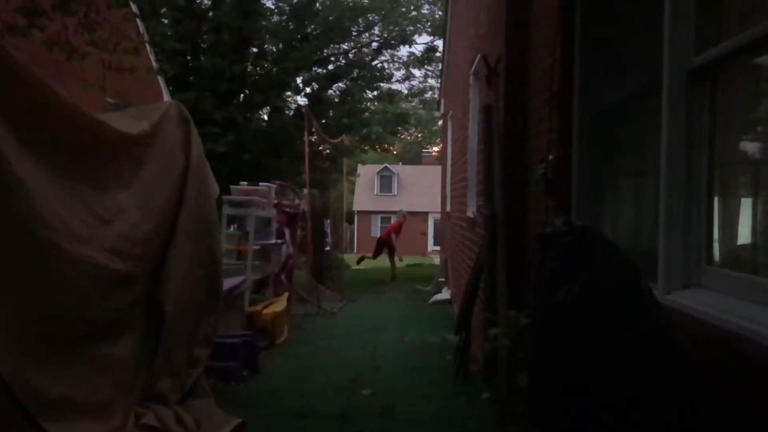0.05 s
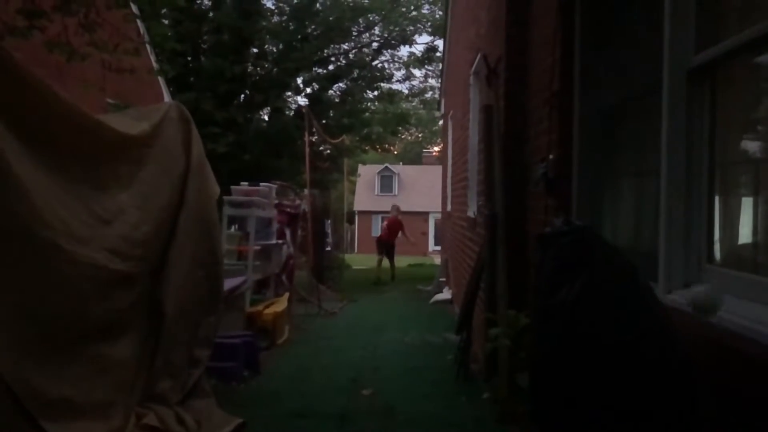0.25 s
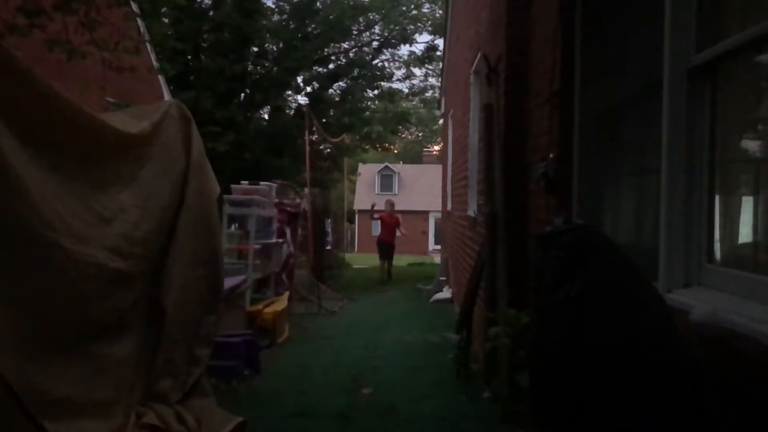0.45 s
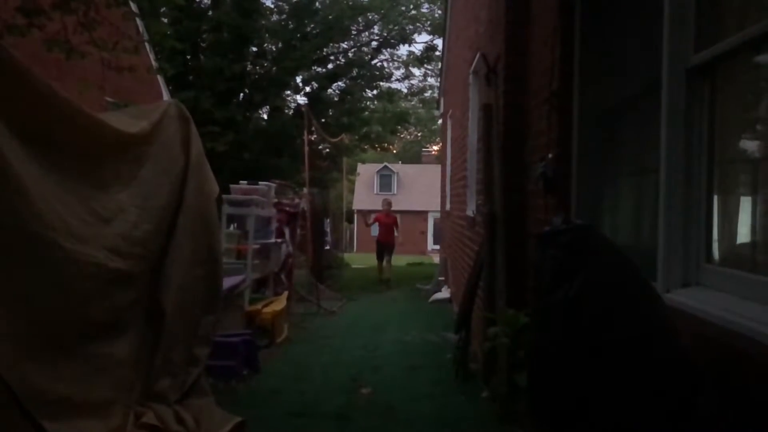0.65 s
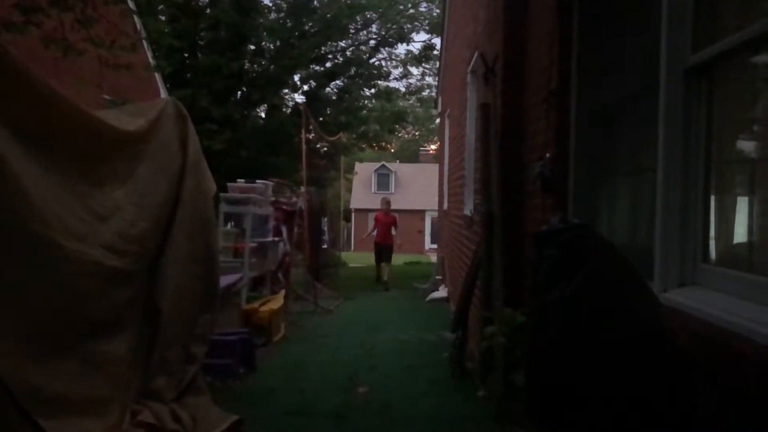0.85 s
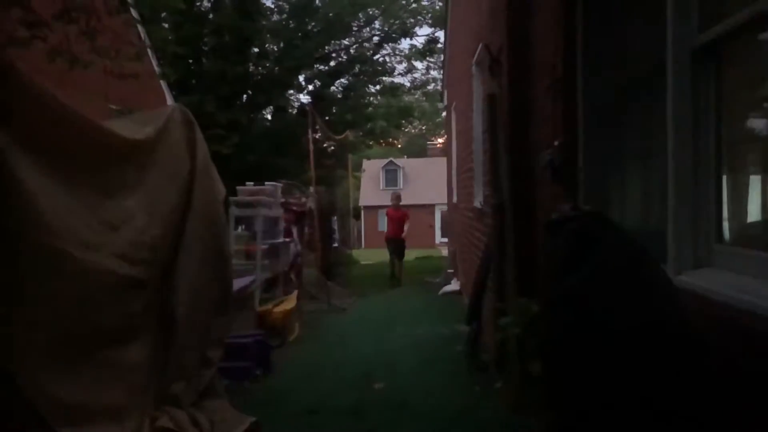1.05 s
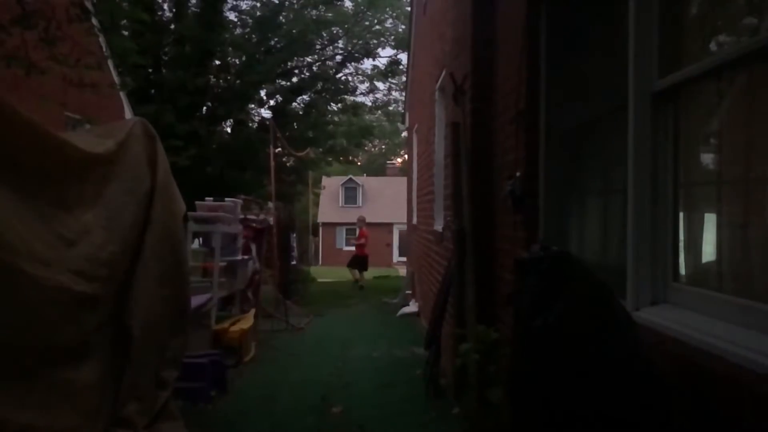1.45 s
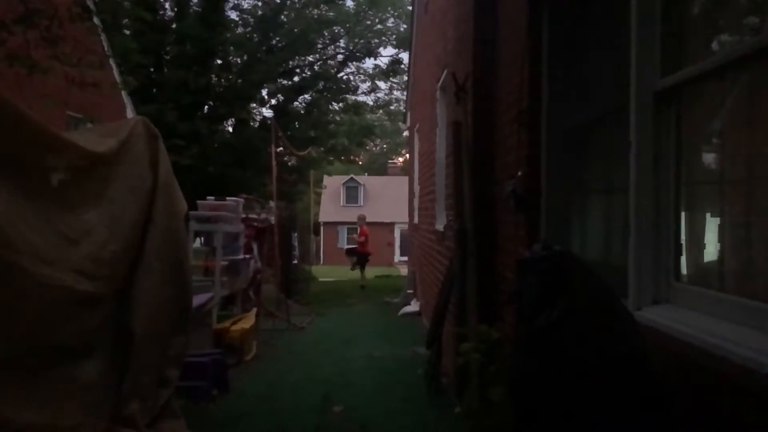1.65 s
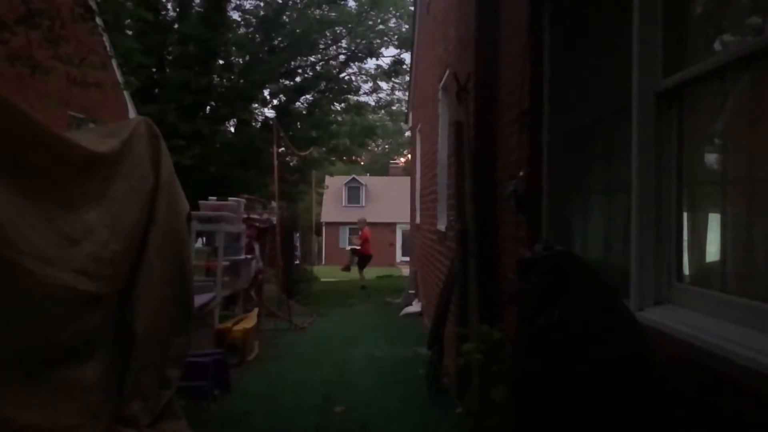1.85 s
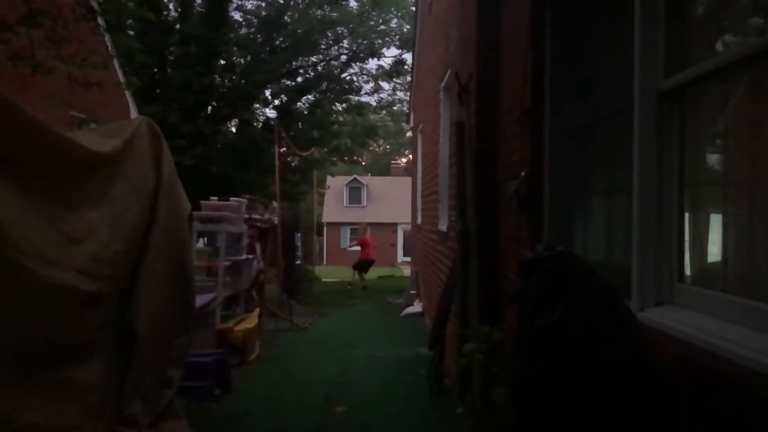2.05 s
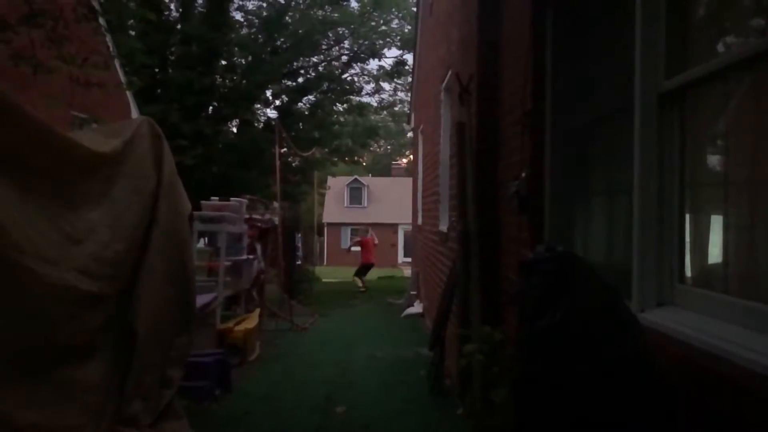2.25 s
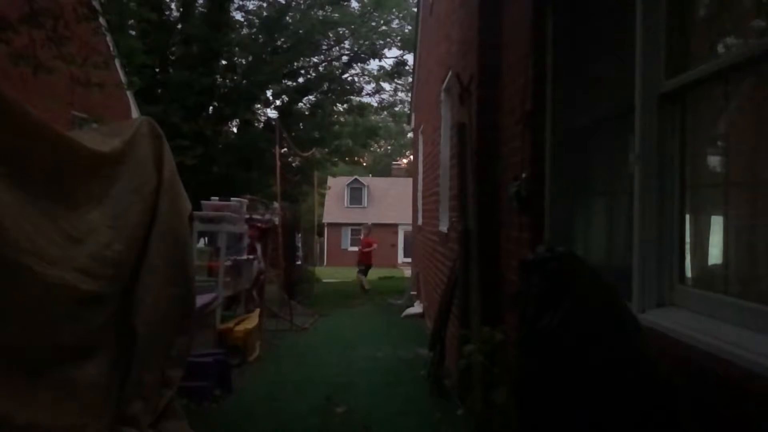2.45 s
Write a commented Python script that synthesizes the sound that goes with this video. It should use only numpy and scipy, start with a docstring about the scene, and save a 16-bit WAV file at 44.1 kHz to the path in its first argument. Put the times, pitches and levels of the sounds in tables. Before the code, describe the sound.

A hollow plastic ball bangs into a window pane, then bounces and settles outdoors.

```python
"""A plastic ball hits a window

A hollow ball whizzes up a narrow brick yard and bangs into a nearby window pane, which bends and rings.
It clacks off the frame, scuffs over crinkly sheeting, knocks a panel again and settles with small ticks.
The walls echo the hits. Behind them are outdoor air, a far rumble and faint insects, then leaves and
a bird. Halfway through, all sound drops out for a moment, and a low drone ends there."""
import sys
import numpy as np
from scipy import signal
from scipy.fft import rfft, irfft
from scipy.io import wavfile

SR = 44100
rng = np.random.default_rng(int(sys.argv[2]) if len(sys.argv) > 2 else 0)


def dump_mix(stems):
    """Bounce the given channels to the path in sys.argv[1] as a 16-bit WAV at rate SR."""
    frames = np.atleast_2d(stems).T  # one column per channel
    limited = np.clip(frames, -1, 1)  # hard clip at full scale
    pcm = np.round(limited * 32767).astype(np.int16)
    wavfile.write(sys.argv[1], SR, pcm)


N = 110250
T = np.arange(N) / SR   # the time of each sample, in seconds
HZ = np.maximum(np.arange(N + 1) * SR / (2 * N), 1)   # the pitches a filter works on

# A TONE table says how strong each pitch is next to the others. A LEVEL table is loudness over time.
# Air rushing through the flying ball: pitch_hz, relative_db
WHIZZ_TONE = [(100, -20), (300, -24), (800, -12), (1100, 2), (1300, 8.5), (1600, -5), (2200, -12),
              (3000, -19), (3850, -9), (4600, -32), (6000, -22.5), (8000, -71), (16000, -42.5)]
# The whizz swells, then ends at the first hit: time_s, level_db
WHIZZ_LEVEL = [(0, -61), (.05, -52.5), (.17, -55.5), (.215, -51.5), (.25, -93)]
# Outdoor air: pitch_hz, relative_db
AIR_TONE = [(15, -56), (25, -17), (41, -17.5), (64, -1.5), (134, -6.5), (149, -11), (236, -9.5),
            (277, -13.5), (326, -14.5), (591, -20), (641, -20.5), (714, -18.5), (1130, -20), (2760, -34),
            (4140, -30.5), (5570, -35), (6210, -34), (8140, -43.5), (16000, -52)]
# The air stays nearly steady: time_s, level_db
AIR_LEVEL = [(0, -52.5), (.9, -54), (1.2, -54.5), (1.4, -55), (1.9, -55.5), (2.5, -54.5)]
# A far rumble: pitch_hz, relative_db
RUMBLE_TONE = [(25, -33), (45, -9), (60, -1), (85, -4), (140, -22), (400, -58.5)]
# The rumble swells near the end: time_s, level_db
RUMBLE_LEVEL = [(0, -67.5), (1.95, -66.5), (2.1, -59.5), (2.3, -57.5), (2.5, -67.5)]
# A low drone: pitch_hz, relative_db
DRONE_TONE = [(30, -55.5), (50, -36.5), (85, -15), (110, -2.5), (135, -14), (168, 0.5), (200, -10.5),
              (260, -11), (500, -50)]
# Buzzing insects: pitch_hz, band_width_hz, level_db, loudest_s, swell_width_s
INSECTS = [(4127, 530, -72, 2.3, 0.71), (5120, 550, -72.5, 2.55, 0.44), (6340, 700, -85.5, 1, .8),
           (7110, 80, -79, 1.34, 0.046)]
# The ball hits a panel: start_s, thud_db, notes_db, dense_ring_db, dull_above_hz, boom_db
BANGS = [(0.2152, 9, -19, -14.5, 760, -43), (0.4976, 5, -38, -33.5, 1200, -41.5),
         (0.6544, -8, -65, -43, 900, -67.5), (0.7536, -21.5, -69, -59, 1200, -61)]
# The thud of the bending panel: pitch_hz, relative_db
THUD_TONE = [(30, -10), (60, 12.5), (120, 4), (250, 16), (400, 18.5), (800, 5), (1500, 6.5), (3000, -9),
             (8000, -5.5)]
# Waves bouncing back from the panel's edges: delay_s, relative_db
EDGE_ECHOES = [(.0058, -13.5), (0.0152, -21.5)]
# Many panel notes blurred into one dense ring: pitch_hz, relative_db
DENSE_RING_TONE = [(40, -18.5), (90, -6.5), (200, -3.5), (400, 7), (750, 3), (1100, -5.5), (1500, -22),
                   (2200, -37), (5000, -57.5)]
# Hard contacts of the ball's shell: start_s, level_db, middle_boost_db, treble_boost_db, fade_s
CLACKS = [(0.2168, -15, -5.5, -5.5, .04), (0.2698, -8.5, -19, -13.5, 0.012), (0.273, -19.5, 17, 8, 0.012),
          (0.2751, -21.5, 14, 5, 0.071), (0.3512, -34, 28, 2, 0.024), (0.365, -14, -6.5, -13.5, 0.025),
          (0.4987, -25.5, 5, -4, 0.03), (0.6556, -32.5, -3, -2, 0.028), (0.7537, -35.5, 16.5, -1, 0.045),
          (0.9804, -45, -12, -4, 0.016), (0.997, -49, -11, -1, .04), (1.027, -40.5, 0, -7, 0.019),
          (1.0335, -39.5, 3.5, -0.5, 0.038), (1.0958, -52, -3.5, -6, .03), (1.121, -48, 1, -10, 0.016)]
# The clack of the plastic shell: pitch_hz, relative_db
SHELL_TONE = [(50, -23.5), (130, -12.5), (300, 0.5), (700, 0.5), (1200, 5), (1600, -6.5), (2100, 3.5),
              (2800, -3.5), (3700, 2), (5200, 3), (6300, 1), (8500, 0.5), (11000, -5.5), (16000, -2.5)]
# Short hollow pops: middle_s, pitch_hz, level_db, width_s
POPS = [(0.2718, 967, -3, 0.0004), (1.261, 497, -41.5, 0.0021)]
# The shell buzzes after the hardest blow: pitch_hz, relative_db
BUZZ_TONE = [(5000, -43), (6900, 6), (7150, 3.5), (7300, 14), (7550, -16), (8100, -19), (9000, -53)]
# The notes a struck panel rings at: pitch_hz, relative_db, fade_s
PANEL_NOTES = [(249, -10, .4), (324, -6, .66), (393.6, 1, .62), (423, -9, .25), (464, -3, .45),
               (510, -6, .32), (534, -6, .33), (593, -10, .3), (631, -7, .26), (683, -7, .24),
               (750, -9, .24), (798, -8, .2), (859, -8, .2), (986, -15, .2), (1129, -15, .2)]
# The panel's lowest notes, a deep boom: pitch_hz, relative_db, fade_s
BOOM_NOTES = [(80, -1.5, 0.93), (106.7, 5.5, 0.42)]
# The echo between the houses, band by band: pitch_hz, relative_db, fade_s
YARD_BANDS = [(90, -8, 0.67), (250, -7, .6), (600, -17, 0.2), (1300, -32.5, 1), (2440, -18, 1),
              (5200, -13.5, 0.42), (9000, -9.5, 0.24), (14090, -17, .43)]
# The struck surface gives way: start_s, pitch_hz, level_db, rise_s, fade_s, length_s
THUMPS = [(0.221, 74.4, -28, 0.011, 0.15, 0.041), (0.366, 250, -15, 0.011, 0.13, .066),
          (0.375, 135, -30.5, 0.0084, .2, 0.046), (0.669, 243, -10.5, 0.017, 0.05, 0.017),
          (0.75, 243, -40, 0.0034, 0.11, .03)]
# The ball scuffs over sheeting: peak_s, level_db, rise_s, fall_s, middle_boost_db
SCUFFS = [(0.3582, -27, 0.0024, .01, 0.5), (0.364, -25.5, 0.0023, 0.021, 7),
          (0.647, -42.5, 0.0071, .014, -8), (0.658, -35, 0.0024, 0.016, 4.5), (0.723, -48, 0.015, 0.022, 6),
          (0.794, -44.5, 0.034, 0.037, -1), (1.001, -57, 0.018, 0.09, -10), (1.036, -55, 0.0089, 0.017, -8)]
# The crinkle of the sheeting: pitch_hz, relative_db
CRINKLE_TONE = [(50, -27), (130, 4), (400, -2.5), (1200, 1.5), (2500, -6.5), (4500, -0.5), (7000, -7),
                (10000, -13), (16000, -17)]
# A faint, bright rustle of leaves: pitch_hz, relative_db
LEAVES_TONE = [(2000, -25), (5000, -6.5), (9000, 2), (16000, -1.5)]
# The leaves stir near the end: time_s, level_db
LEAVES_LEVEL = [(2.25, -91), (2.38, -69), (2.46, -73), (2.5, -72)]

BEND_DELAY_S = 0.003246   # how long a 1 kHz bending wave travels in the panel; lower ones take longer
DROPOUT_START_S, DROPOUT_END_S = 1.2105, 1.2565


def from_db(db):
    """Turn decibels into a number to multiply a sound by."""
    return 10 ** (np.asarray(db) / 20)


def curve_db(tone):
    """Join the points of a tone table to get decibels at every pitch."""
    hz, db = np.transpose(tone)
    return np.interp(np.log(HZ), np.log(hz), db)


def level(points):
    """Join the points of a level table to get a volume for every sample."""
    return from_db(np.interp(T, *np.transpose(points)))


def colour(sound, tone_db):
    """Filter a sound to this tone; plain hiss would keep its overall power."""
    gain = from_db(tone_db)
    gain = gain / np.sqrt(np.mean(gain ** 2))
    # These steps make the filter ring only after a sound, never before it.
    cepstrum = irfft(np.log(gain + 1e-9))
    cepstrum[1:N] *= 2
    cepstrum[N + 1:] = 0
    return irfft(rfft(sound, 2 * N) * np.exp(rfft(cepstrum)))[:N]


def noise(tone):
    """Steady noise shaped by a tone table."""
    return colour(rng.standard_normal(N), curve_db(tone))


def bell(distance, width):
    """A smooth hill, highest where the distance is zero."""
    return np.exp(-.5 * (distance / width) ** 2)


def decay(start_s, fade_s, rise_s=1e-4):
    """A volume that rises, then dies away by 60 dB every fade_s."""
    age = np.maximum(T - start_s, 0)
    return (1 - np.exp(-age / rise_s)) * np.exp(-np.log(1000) * age / fade_s)


def delay(seconds):
    """Multiply a spectrum by this to make its sound come later."""
    return np.exp(-2j * np.pi * HZ * seconds)


def ring(start_s, notes):
    """Fading pure notes struck together; every second one swings the opposite way."""
    return sum((-1) ** k * from_db(db) * decay(start_s, fade_s) * np.sin(2 * np.pi * hz * (T - start_s))
               for k, (hz, db, fade_s) in enumerate(notes))


def whizz():
    """Air whistles through the hollow ball as it flies."""
    return level(WHIZZ_LEVEL) * noise(WHIZZ_TONE)


def background(drone_db=-54.5):
    """Outdoor air, a far rumble and a low drone that stops halfway."""
    drone = from_db(drone_db) * noise(DRONE_TONE) * (T < DROPOUT_START_S)
    air = level(AIR_LEVEL) * noise(AIR_TONE)
    rumble = level(RUMBLE_LEVEL) * noise(RUMBLE_TONE)
    return air + rumble + drone


def insects():
    """Far insects buzz in narrow bands of pitch that swell and fade."""
    out = 0
    for hz, width_hz, db, loudest_s, swell_s in INSECTS:
        band_db = -20 * np.log10(1 + (2 * (HZ - hz) / width_hz) ** 2)
        buzz = colour(rng.standard_normal(N), band_db)
        out += from_db(db) * bell(T - loudest_s, swell_s) * buzz
    return out


def panel_bangs(wall_delay_s=.0305, wall_db=-12.5, wall_dull_hz=800):
    """A hit bends the panel. High waves outrun low ones, so the thud sweeps down, echoes and rings."""
    travel = np.exp(-4j * np.pi * BEND_DELAY_S * np.sqrt(1000 * HZ))
    edges = sum(from_db(db) * delay(delay_s) for delay_s, db in EDGE_ECHOES)
    # The thud comes back, duller, from the house opposite.
    wall = from_db(wall_db) * delay(wall_delay_s) / (1 + (HZ / wall_dull_hz) ** 4)
    out, dense_ring = 0, noise(DENSE_RING_TONE)
    for start_s, thud_db, _, dense_db, dull_hz, _ in BANGS:
        thud = from_db(thud_db + curve_db(THUD_TONE)) / np.sqrt(1 + (HZ / dull_hz) ** 4)
        out += irfft(thud * travel * (1 + edges + wall) * delay(start_s))[:N]
        out += from_db(dense_db) * decay(start_s + BEND_DELAY_S, fade_s=.22, rise_s=0.0055) * dense_ring
    return out


def ball_clacks(middle_hz=810, treble_hz=10000):
    """The hard shell clacks at each contact and now and then gives a hollow pop."""
    shell = curve_db(SHELL_TONE)
    middle, treble = bell(np.log2(HZ / middle_hz), 1), bell(np.log2(HZ / treble_hz), 1)
    out = 0
    for start_s, db, middle_db, treble_db, fade_s in CLACKS:
        burst = rng.standard_normal(N) * decay(start_s, fade_s)
        out += from_db(db) * colour(burst, shell + middle_db * middle + treble_db * treble)
    for middle_s, hz, db, width_s in POPS:
        out -= from_db(db) * bell(T - middle_s, width_s) * np.sin(2 * np.pi * hz * (T - middle_s))
    return out


def close_ringing(buzz_db=-17, damping_db=-6.5, damping_s=0.014):
    """Up close, the shell buzzes and the panel rings and booms. Each bang damps what still rings."""
    first_clack_s = CLACKS[0][0]
    out = from_db(buzz_db) * decay(first_clack_s, fade_s=0.075, rise_s=0.0023) * noise(BUZZ_TONE)
    for start_s, _, notes_db, _, _, boom_db in BANGS:
        out *= from_db(damping_db * np.clip((T - start_s) / damping_s, 0, 1))
        out += from_db(notes_db) * ring(start_s + BEND_DELAY_S, PANEL_NOTES)
        out += from_db(boom_db) * ring(start_s + BEND_DELAY_S, BOOM_NOTES)
    return out


def yard_echo(sound, near_wall_db=-12):
    """Sound scatters quickly off the nearest wall and lingers between the houses as a wash of noise."""
    centres = np.log([row[0] for row in YARD_BANDS])
    spectrum, out = rfft(sound, 2 * N), 0
    near = decay(start_s=0.0022, fade_s=0.11) ** 2
    for k, (_, db, fade_s) in enumerate(YARD_BANDS):
        band = np.sqrt(np.interp(np.log(HZ), centres, np.arange(len(YARD_BANDS)) == k))
        far = decay(0, fade_s, rise_s=0.0047) ** 2
        tail = from_db(db) ** 2 * far / far.sum() + from_db(near_wall_db) ** 2 * near / near.sum()
        energy = irfft(spectrum * band)[:N] ** 2
        lingering = signal.fftconvolve(energy, tail)[:N]
        wash = irfft(rfft(rng.standard_normal(2 * N)) * band)[:N]
        out += np.sqrt(np.abs(lingering)) * wash / wash.std()
    return out


def thumps(sag_per_s=4.9):
    """The surface gives under the ball with a short note that sags in pitch."""
    out = 0
    for start_s, hz, db, rise_s, fade_s, length_s in THUMPS:
        age = np.maximum(T - start_s, 0)
        pitch_hz = hz * np.exp(-sag_per_s * age) * (T > start_s)
        note = np.sin(2 * np.pi * np.cumsum(pitch_hz) / SR)
        soft_stop = 1 / (1 + (age / length_s) ** 10)
        out += from_db(db) * decay(start_s, fade_s, rise_s) * soft_stop * note
    return out


def sheeting_scuffs(crinkles_per_s=10000, spread_db=5, middle_hz=1140):
    """Tiny crinkles swell as the ball presses into the sheeting and fade as it leaves."""
    out, tone, middle = 0, curve_db(CRINKLE_TONE), bell(np.log2(HZ / middle_hz), 1)
    for peak_s, db, rise_s, fall_s, middle_db in SCUFFS:
        clicks = (rng.random(N) < crinkles_per_s / SR) * rng.choice([-1, 1], N)
        crinkles = clicks * from_db(spread_db * np.minimum(rng.exponential(1, N), 4))
        press = bell(np.minimum(T - peak_s, 0), rise_s) * (T > peak_s - 1.5 * rise_s)
        leave = np.exp(-np.maximum(T - peak_s, 0) / fall_s)
        scuff = press * leave * crinkles / crinkles.std()
        out += from_db(db) * colour(scuff, tone + middle_db * middle)
    return out


def bird(middle_s=2.255, middle_hz=2800, fall_octaves_per_s=8, level_db=-72, width_s=.025):
    """A far bird gives one faint whistle that slides down."""
    pitch_hz = middle_hz * 2 ** np.clip(-fall_octaves_per_s * (T - middle_s), -1, 1)
    return from_db(level_db) * bell(T - middle_s, width_s) * np.sin(2 * np.pi * np.cumsum(pitch_hz) / SR)


def leaves():
    """Leaves rustle with a soft, bright hiss."""
    return level(LEAVES_LEVEL) * noise(LEAVES_TONE)


def scene(low_cut_hz=40):
    """Mix the ball's flight, its hits, their echo and the outdoor sounds into one channel."""
    hits = panel_bangs() + ball_clacks() + sheeting_scuffs()
    low_cut = signal.butter(4, low_cut_hz, "high", fs=SR, output="sos")
    hits_in_yard = signal.sosfilt(low_cut, hits + yard_echo(hits) + close_ringing() + thumps())
    return (hits_in_yard + whizz() + background() + leaves() + insects() + bird())[None]


def record(dry, high_cut_hz=16000):
    """The sound drops out for a moment, and the very highest treble is cut away."""
    sound_on = (T < DROPOUT_START_S) | (T > DROPOUT_END_S)
    high_cut = signal.ellip(10, .1, 80, high_cut_hz, fs=SR, output="sos")
    return signal.sosfilt(high_cut, dry * sound_on)


dry = scene()
out = record(dry)
dump_mix(out)
```